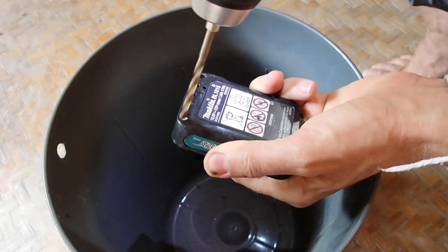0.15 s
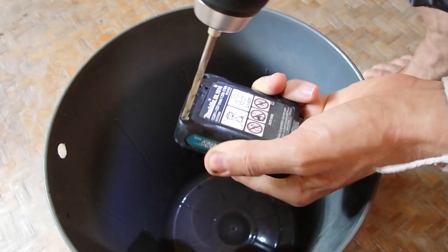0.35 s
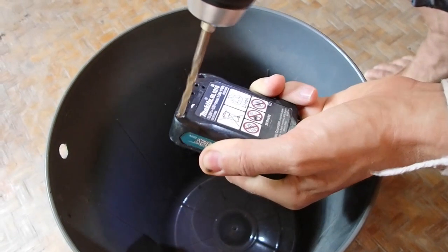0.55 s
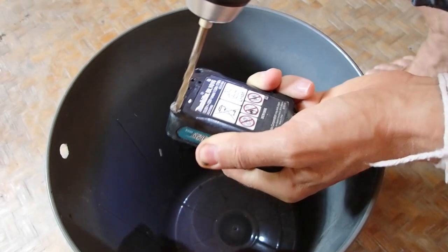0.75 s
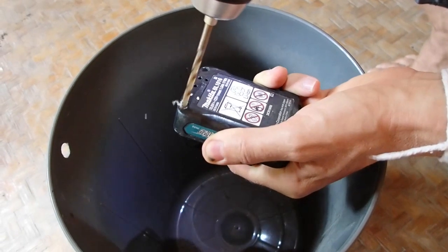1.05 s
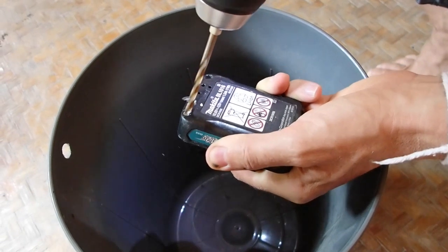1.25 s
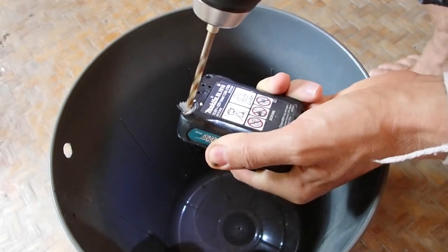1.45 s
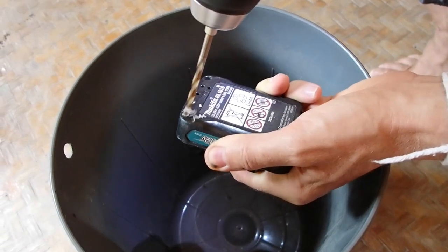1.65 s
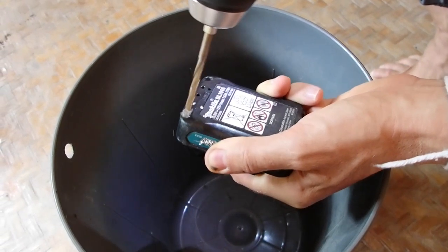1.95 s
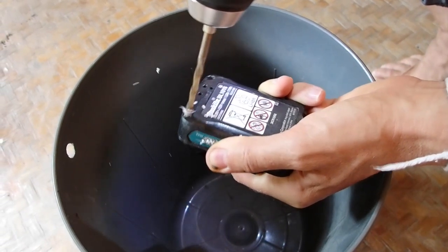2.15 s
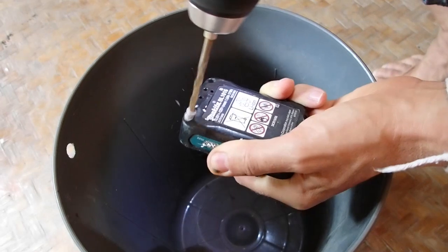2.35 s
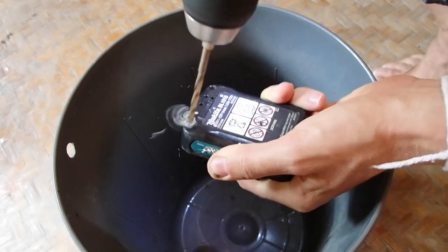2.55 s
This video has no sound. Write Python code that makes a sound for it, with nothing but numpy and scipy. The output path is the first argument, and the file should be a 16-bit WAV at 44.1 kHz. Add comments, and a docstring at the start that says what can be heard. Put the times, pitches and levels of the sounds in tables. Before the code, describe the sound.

A cordless drill grinds into a plastic case, very close and strongly right, duller on the left. It whirrs at half speed, chirps up to full whine around 0.35 s, holds until 0.8, then winds down with crackling chips to a low growl by 1.35. It creeps along, surges sharply at 1.75, holds with a brief dip near 2.1, and slows from 2.45. Gear rattle, faint handling rumble, short room tail.

```python
"""Cordless drill boring into a plastic case

A drill bores into a hand-held plastic case, close to the right of the microphone. From half trigger it
runs up to full speed, sinks to about a third of that, creeps on, runs up again and at last slows.
The motor is a sum of sines at multiples of its turn rate, weighted by the housing's resonances.
The gears are noise and random knocks, throbbing with the turns; the chips are clicks that ring damped
modes. A short diffuse tail and a soft handling rumble complete the scene."""
import sys
import numpy as np
from scipy import signal
from scipy.fft import rfft, irfft, next_fast_len
from scipy.io import wavfile
from scipy.ndimage import uniform_filter1d

SR = 44100
rng = np.random.default_rng(int(sys.argv[2]) if len(sys.argv) > 2 else 0)


def inscribe(sig):
    """Save sig as 16-bit PCM at rate SR to the path in sys.argv[1].

    A 1-D sig is mono; a 2-D sig holds one channel per row.
    Samples are clipped to [-1, 1] before scaling.
    """
    pcm = np.round(np.clip(np.atleast_2d(sig).T, -1, 1) * 32767)
    wavfile.write(sys.argv[1], SR, pcm.astype(np.int16))


N = 119070
TIME = np.arange(N) / SR


def from_db(db):
    """Level to amplitude: 20 dB is a factor of ten."""
    return 10 ** (np.asarray(db) / 20)


def rms_one(x):
    """Normalisation: divide by the root mean square."""
    return x / np.sqrt(np.mean(x ** 2) + 1e-20)


def in_time(rows):
    """Linear interpolation of a control curve at every sample."""
    return np.interp(TIME, *np.transpose(rows))


def at_hz(points, hz):
    """Spectral interpolation: level is linear in log frequency."""
    point_hz, db = np.transpose(points)
    return np.interp(np.log(np.maximum(hz, 1)), np.log(point_hz), db)


def drift(cutoff_hz):
    """Low-passed noise: slow random wandering of rms 1."""
    lowpass = signal.butter(2, cutoff_hz, fs=SR, output="sos")
    wander = signal.sosfilt(lowpass, rng.standard_normal(N + SR))
    return rms_one(wander[SR:])  # the first second lets the filter settle


def colour(x, points, keep_power=True):
    """Minimum-phase filtering: folding the cepstrum makes the given spectrum causal."""
    size = 2 * next_fast_len(N)
    gain = from_db(at_hz(points, np.arange(size // 2 + 1) * SR / size))
    if keep_power:
        gain = rms_one(gain)
    cepstrum = irfft(np.log(gain))[:size // 2]
    cepstrum[1:] *= 2
    response = np.exp(rfft(cepstrum, size))
    return irfft(rfft(x, size) * response)[..., :N]


def clicks(per_s, spread_db):
    """Random impulses: independent chances at each sample, with uneven size and sign."""
    sizes = from_db(spread_db * np.minimum(rng.exponential(1, N), 4))
    happens = rng.random(N) < per_s / SR
    return happens * sizes * rng.choice([-1, 1], N)


def ring(x, hz, t60):
    """Damped resonator: a unit click starts a decaying sine of initial height 1."""
    radius = np.exp(-np.log(1000) / (t60 * SR))
    angle = 2 * np.pi * hz / SR
    feedback = [1, -2 * radius * np.cos(angle), radius * radius]
    return signal.lfilter([0, np.sin(angle)], feedback, x + 1e-18)


def motor(speed, turns):
    """Harmonic excitation: multiples of the turn rate swell under torque and sweep through resonances."""
    # motor tones: (multiple of turn rate, relative level at each of the four tone speeds [dB] x 4,
    # gain while speeding up and loss while slowing, at most [dB])
    tones = [(1,-20,-4.5,8.5,0,2),(4,2,2.5,3,-17,1),(5,-24,-14.5,-14,-9.5,-4),(7,-29,-14,-12,-14,-1),(8,-15.5,4.5,-1.5,7.5,0.5),(10,-15,-26.5,-6.5,-7.5,-3),(12,-26,2.5,-7,5,2.5),(16,-14,1.5,2,-9,2.5),(20,-12,-3.5,-12,-8,3),(24,-22,0,-6,-12,-8),(32,-10,1,-2,-10,7.5)]
    # turn rates at which the tone levels are given: crawl, half, three-quarter, full [turns/s]
    tone_speeds = [158, 198.7, 356, 444]
    # how strongly the housing radiates a tone: (frequency [Hz], level [dB])
    housing = [(150,-69),(230,-44.5),(330,-41),(440,-31.5),(700,-25.5),(830,-29),(960,-24.5),(1220,-17.5),(1420,-37),(1600,-33.5),(1800,-20),(2100,-20.5),(2450,-29.5),(2950,-30),(3270,-24.5),(3570,-16.5),(3850,-17.5),(4150,-12.5),(4550,-36),(6000,-38),(11000,-42)]
    torque_hz_per_s = 460  # acceleration scale on which the torque effect saturates
    surge_db, surge_hz_per_s = 7, 3200  # a sharp squeeze of the trigger makes the upper tones chirp
    surge_above_hz = 3660  # lower tones fall back meanwhile
    waver_db, waver_hz = 1.83, 15

    acceleration = uniform_filter1d(np.gradient(speed) * SR, size=900)
    torque = np.tanh(acceleration / torque_hz_per_s)
    surge = surge_db * np.clip(acceleration / surge_hz_per_s, 0, 1)
    out = np.zeros(N)
    for multiple, *levels_db, torque_db in tones:
        tone_hz = multiple * speed
        db = np.interp(speed, tone_speeds, levels_db) + at_hz(housing, tone_hz)
        db = db + torque_db * torque
        db = db + surge * np.tanh(2 * np.log2(tone_hz / surge_above_hz))
        db = db + waver_db * drift(waver_hz)
        phase_turns = multiple * turns + rng.random()
        out += from_db(db) * np.sin(2 * np.pi * phase_turns)
    return out


def gears(speed, turns):
    """Modulated noise: rubbing and tooth knocks throb with the gear train and follow effort."""
    # strength of the gear rattle: (time [s], relative level [dB])
    effort = in_time([(0,-23.5),(.24,-23.5),(.26,-22),(.3,-23),(.325,-20),(.395,-18),(.42,-21.5),(.71,-25),(.95,-23.5),(1.16,-23.5),(1.25,-25.5),(1.345,-29.5),(1.353,-21.5),(1.44,-22.5),(1.58,-23),(1.64,-26),(1.71,-26.5),(1.74,-17),(1.83,-18.5),(1.87,-21.5),(2.07,-24.5),(2.16,-21.5),(2.41,-24.5),(2.7,-22)])
    rubbing_db, knocking_db = 7, 1
    knocks_per_turn, knock_spread_db = 9, 3.0  # mean number of knocks
    mesh_ratio, mesh_depth = .872, 0.25  # throbs per turn, as the sun gear turns against its carrier
    grind_db, grind_hz = 0.54, 59  # the bit bites unevenly
    body_hz, body_follows = 2220, 0.56  # the low part follows effort less

    rubbing = from_db(rubbing_db) * rng.standard_normal(N)
    knocks = rms_one(clicks(knocks_per_turn * speed, knock_spread_db))
    force = rubbing + from_db(knocking_db) * knocks
    throb = 1 + mesh_depth * np.sin(2 * np.pi * mesh_ratio * turns)
    force = force * throb * from_db(grind_db * drift(grind_hz))

    low = signal.sosfilt(signal.butter(1, body_hz, fs=SR, output="sos"), force)
    low_effort = effort.mean() + body_follows * (effort - effort.mean())
    return (force - low) * from_db(effort) + low * from_db(low_effort)


def bit(speed):
    """Impulse excitation of modes: clear snaps and a crackle of chips ring in bit and case."""
    # the bit snaps off a chip, or the gears take up their slack: (time [s], level before snap_db [dB])
    snaps = [(0.3077, -3), (0.795, -13), (0.9366, -8), (0.9433, -7), (0.954, -11), (0.9994, -20),
             (1.0222, -11), (1.0328, -21), (1.0787, -10), (1.1003, -4.5), (1.3514, -4.5), (2.092, -12),
             (2.596, -21), (2.664, -12)]
    # what a snap sets ringing: (frequency [Hz], relative level [dB], 60 dB decay time [s])
    snap_modes = [(1390,-13,0.023),(2870,-3,0.0033),(4510,-4.5,0.013),(4930,-2.5,0.0037),(5840,-10,0.01),(7500,-12,0.015)]
    snap_db, chip_db = 6.5, -3.5
    chips_per_s, chip_speed, chip_speed_width = 260, 358, 60  # most chips at middling speed [turns/s]

    chip_rate = chips_per_s * np.exp(-((speed - chip_speed) / chip_speed_width) ** 2)
    hits = from_db(chip_db) * clicks(chip_rate, spread_db=-1.0)
    for s, db in snaps:
        hits[int(s * SR)] += from_db(db + snap_db)

    out = np.zeros(N)
    for k, (hz, db, t60) in enumerate(snap_modes):
        uneven_hits = hits * rng.uniform(0.47, 1, N)  # each hit drives each mode differently
        out += (-1) ** k * from_db(db) * ring(uneven_hits, hz, t60)
    return out


def room(x):
    """Diffuse reverberation: convolution with exponentially decaying noise of unit energy."""
    decay_s = 0.021  # time for the amplitude to fall to 1/e
    tail = rng.standard_normal(SR // 2) * np.exp(-TIME[:SR // 2] / decay_s)
    return signal.fftconvolve(x, tail / np.linalg.norm(tail))[:N]


def handling():
    """Low-frequency noise: a soft rumble with decaying bumps, independent on each side."""
    # soft low bumps of handling: (time [s], level before the side gains [dB])
    bumps = [(0.01,-42),(0.253,-45),(1.095,-46),(1.262,-46),(1.352,-42),(1.464,-38)]
    # colour of the rumble: (frequency [Hz], relative level per Hz [dB])
    rumble_colour = [(20,-19),(60,0.5),(110,4.5),(200,-0.5),(400,-7),(1500,-43)]
    bump_decay_s, steady_db = 0.018, -57.5  # steady level before the side gains
    side_gains = from_db([[6.5], [0.5]])  # left, right [dB]

    level = np.full(N, from_db(steady_db))
    for s, db in bumps:
        level += from_db(db) * (TIME >= s) * np.exp(-np.abs(TIME - s) / bump_decay_s)
    return level * side_gains * colour(rng.standard_normal((2, N)), rumble_colour)


def scene():
    """Common drive and head-on shading: one speed rules all; the left is later, duller, with own rattle."""
    # motor speed before smoothing and jitter: (time [s], turn rate [turns/s])
    speed_curve = [(0.0, 201.0), (0.05, 204.8), (0.12, 203.9), (0.18, 221.9), (0.24, 227.5), (0.31, 246.2),
                   (0.32, 274.6), (0.34, 354.1), (0.35, 389.4), (0.38, 427.8), (0.46, 447.6), (0.8, 441.6),
                   (0.91, 401.0), (1.01, 351.1), (1.11, 294.7), (1.19, 250.6), (1.24, 223.8), (1.35, 157.0),
                   (1.37, 182.9), (1.39, 203.9), (1.44, 222.5), (1.56, 229.4), (1.59, 225.2), (1.62, 214.0),
                   (1.71, 171.0), (1.71, 187.7), (1.74, 289.7), (1.74, 315.6), (1.77, 376.7), (1.8, 397.2),
                   (1.81, 427.4), (1.87, 445.1), (1.97, 446.4), (2.05, 439.0), (2.13, 410.2), (2.23, 450.3),
                   (2.41, 442.3), (2.5, 415.0), (2.62, 350.9), (2.7, 309.4)]
    # colour of the rattle, with resonances of housing and bit: (frequency [Hz], relative level per Hz [dB])
    rattle_colour = [(100,-40),(280,-25.5),(450,-13),(580,-14),(790,-6.5),(1100,-5.5),(1360,-1.5),(1650,-5),(2100,-1.5),(2450,-7.5),(2950,-0.5),(3700,-3),(4300,4),(5000,0),(5900,-2.5),(6750,-11),(7300,-1),(7700,1.5),(8400,-9),(9400,-19),(12500,-17),(14300,-18.5),(15200,-19)]
    # shading of the left side: (frequency [Hz], gain [dB])
    shade = [(100,-10),(270,-5.5),(450,-9),(740,-11.5),(1220,-15),(2000,-18.5),(3000,-22.5),(3600,-32),(4300,-37.5),(4900,-23),(7700,-23),(9300,-23),(15000,-32.5)]
    speed_jitter, left_lag_s = .0012, 0.00015  # jitter as a fraction of the speed
    room_db = -10.5
    scatter_db, scatter_hz = 4, 3000  # the left side's own rattle, before shading

    speed = uniform_filter1d(in_time(speed_curve), size=400) * (1 + speed_jitter * drift(32))
    turns = np.cumsum(speed) / SR
    rattle = colour(gears(speed, turns), rattle_colour) + bit(speed)
    drill = motor(speed, turns) + rattle
    right = drill + from_db(room_db) * room(rattle)

    highpass = signal.butter(1, scatter_hz, "high", fs=SR, output="sos")
    scattered = signal.sosfilt(highpass, colour(gears(speed, turns), rattle_colour))
    delayed = np.interp(TIME - left_lag_s, TIME, drill)
    left = colour(delayed + from_db(scatter_db) * scattered, shade, keep_power=False)
    return np.array([left, right]) + handling()


def record(dry):
    """Clipping and band limiting: peaks flatten at full scale, then a steep low-pass cuts the top."""
    lowpass = signal.ellip(12, .1, 80, 15600, fs=SR, output="sos")  # ripple, stopband [dB], cutoff [Hz]
    return signal.sosfilt(lowpass, np.clip(dry, -1, 1))


dry = scene()
out = record(dry)
inscribe(out)
```